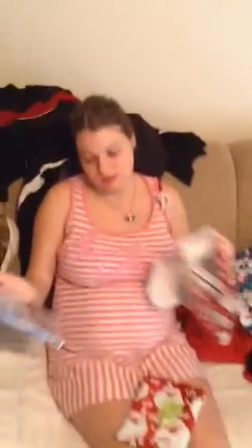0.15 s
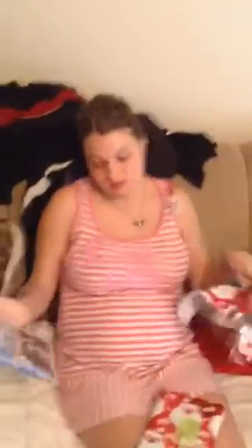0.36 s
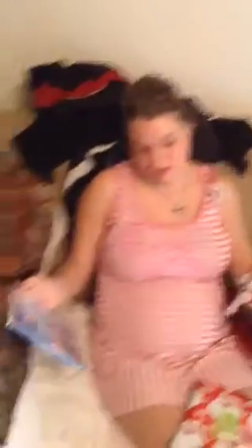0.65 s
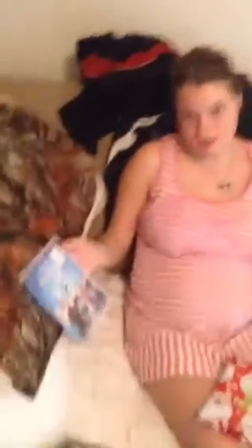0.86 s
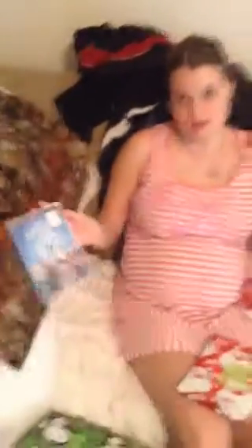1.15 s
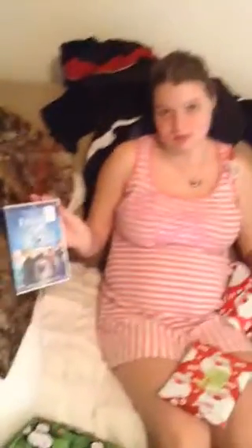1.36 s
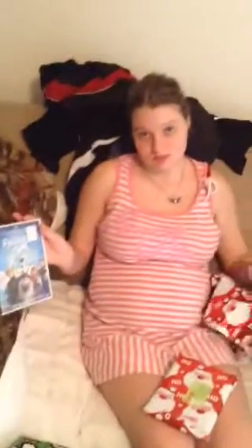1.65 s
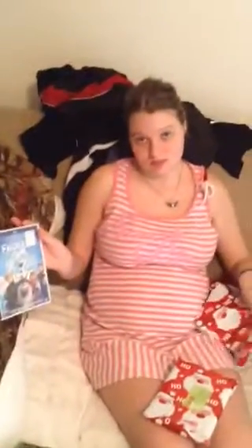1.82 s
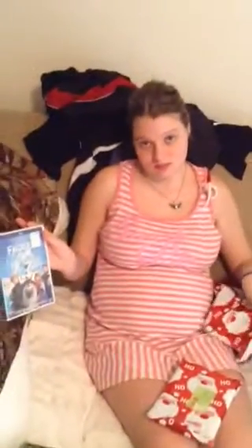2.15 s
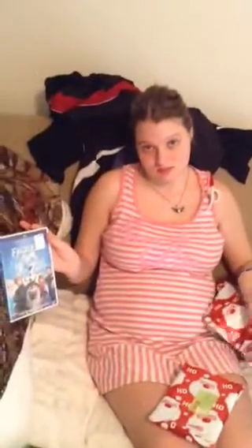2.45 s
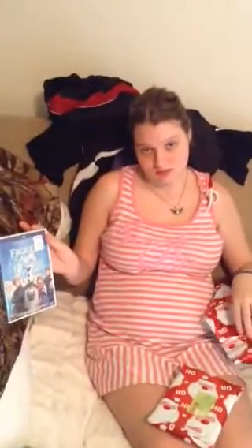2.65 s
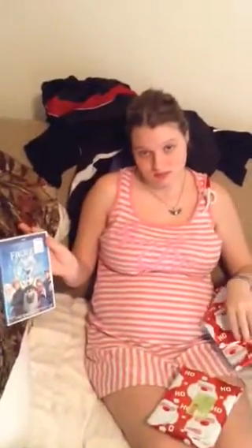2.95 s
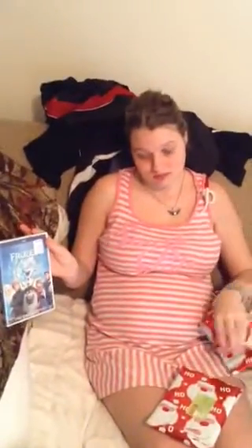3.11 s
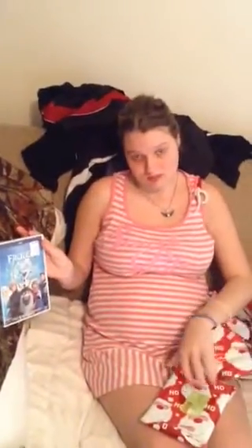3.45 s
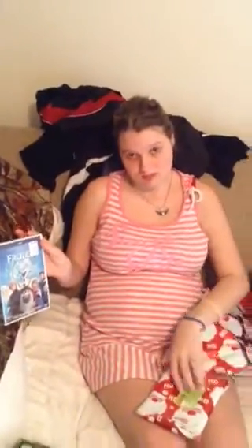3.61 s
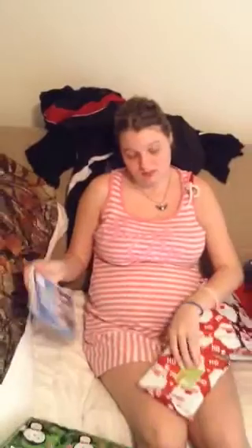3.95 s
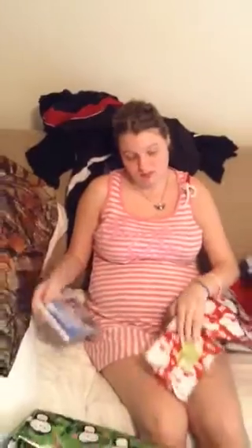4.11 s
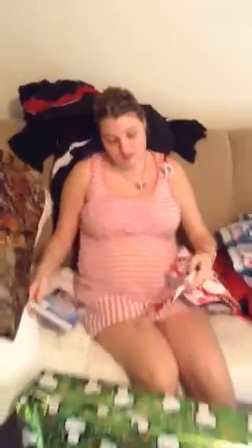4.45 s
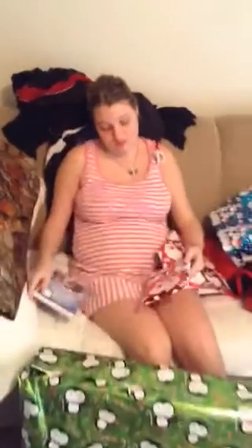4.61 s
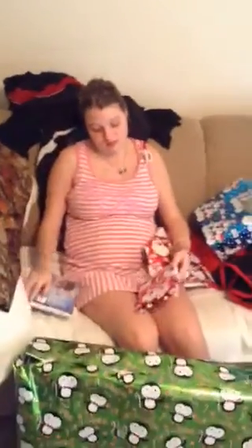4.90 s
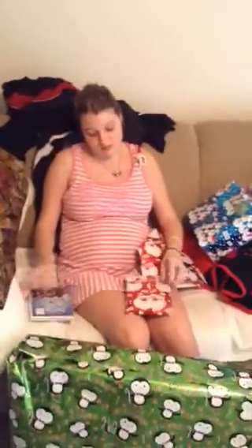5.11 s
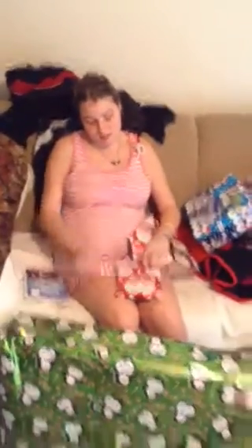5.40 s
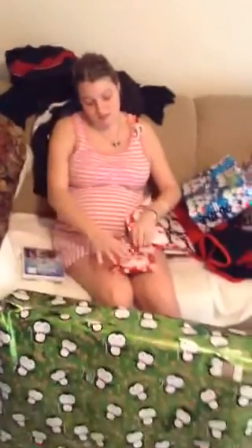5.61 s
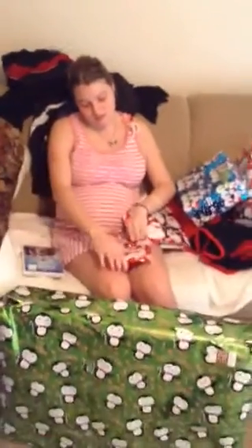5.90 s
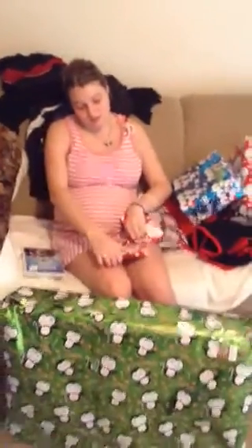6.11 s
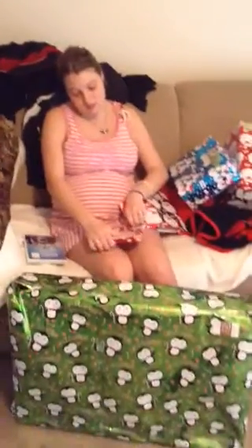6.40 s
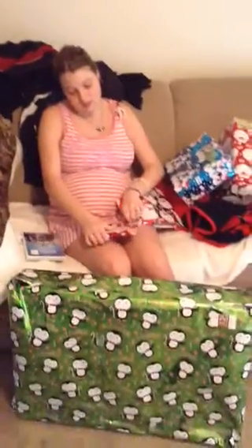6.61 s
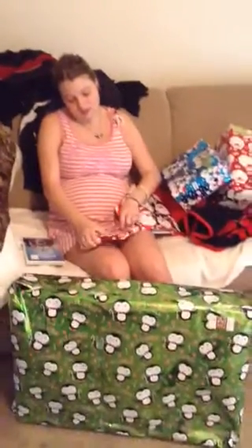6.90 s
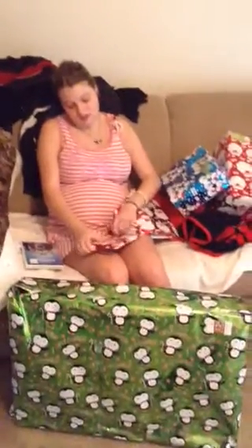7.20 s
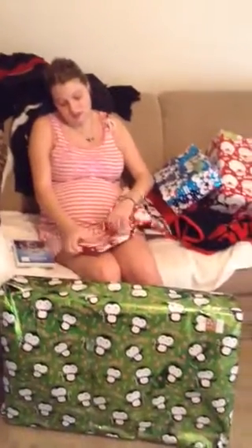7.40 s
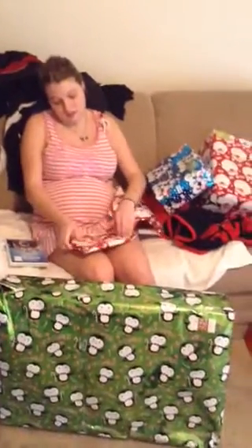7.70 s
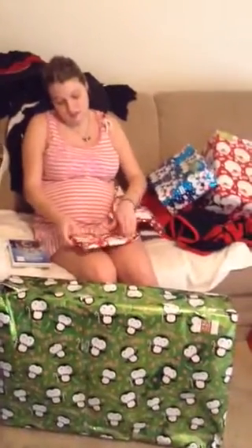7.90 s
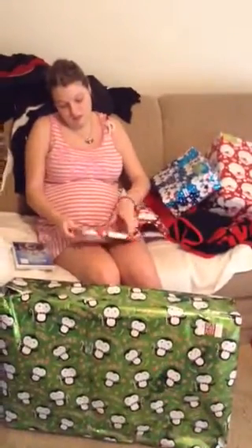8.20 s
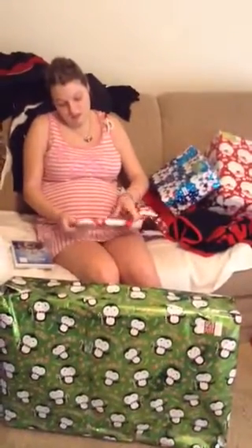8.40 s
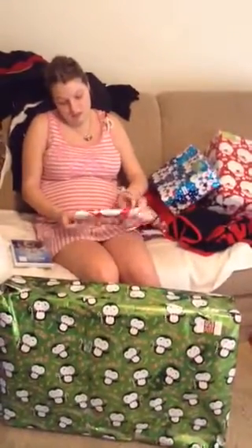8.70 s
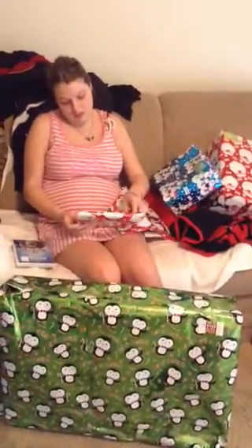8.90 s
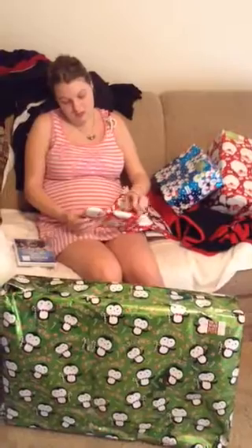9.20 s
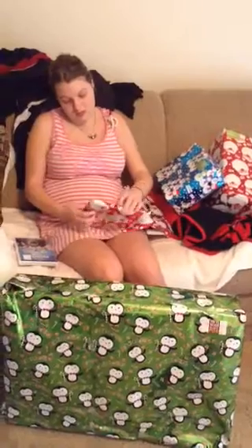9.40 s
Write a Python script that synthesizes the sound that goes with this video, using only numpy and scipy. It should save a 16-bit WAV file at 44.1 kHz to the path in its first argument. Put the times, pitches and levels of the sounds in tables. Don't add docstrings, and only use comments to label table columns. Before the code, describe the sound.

A quiet furnished living room, heard from a phone a few steps away: a faint low motor hum wavers over duct rumble and soft air hiss throughout. Stiff gift paper crackles at once, with a strong snap cluster around 0.3 s, rustling to about 1 s, and sharp pops near 1.6 and 1.9 s. At about 2.2 s a flat plastic case rubs hollowly on a blanket, rising slightly in pitch, then things thin out. Crisp snaps return at 3.1-3.4 s, with cloth shifting and more pops around 3.8-4.2 s. A loud crease cracks at 4.65 s, followed by sliding sheets and scattered pops to 6.2 s as the hum grows a little clearer. A hard snap at 6.56 s leads into a brief bright rip at 6.75 s, with thin high tape squeaks at 6.9-7.3 s. Smaller crumples, flicks and rustles continue unevenly until about 9.6 s.

```python
import sys
import numpy as np
from scipy import signal
from scipy.fft import rfft, irfft, next_fast_len
from scipy.io import wavfile
from scipy.ndimage import uniform_filter1d

SR = 44100
rng = np.random.default_rng(int(sys.argv[2]) if len(sys.argv) > 2 else 0)


def gain_from_decibels(decibels):
    exponent = np.asarray(decibels, float) / 20
    return 10 ** exponent


def store_pcm(level_fs):
    pcm = np.round(np.clip(level_fs, -1, 1) * 32767).astype(np.int16)
    wavfile.write(sys.argv[1], SR, np.atleast_2d(pcm).T)


N = 421155

# time in seconds, level in dB rms.
HUM = [(0, -50.5), (.21, -54.5), (.48, -52), (.79, -57.5), (1.38, -54), (1.73, -57), (2.66, -53.5),
       (2.93, -58.5), (3.08, -52.5), (4.28, -56), (5.93, -47.5), (6.65, -50), (6.86, -50.5), (8.67, -49.5),
       (9.12, -53), (9.28, -48.5)]
# frequency in Hz, density in dB per Hz.
AIR_SPECTRUM = [(100, -50), (500, 5.5), (1000, -3), (1700, -8.5), (3000, -8.5), (6000, -17), (10000, -17),
                (15500, -26)]
# frequency in Hz, density in dB per Hz.
RUMBLE_SPECTRUM = [(40, -46), (90, -23.5), (130, -8), (190, -1), (300, -2), (420, -5), (600, -30),
                   (1000, -33)]
# frequency in Hz, width in Hz, lift in dB.
STANDING_WAVES = [(122.4, 3.1, 4), (142, 6, 1), (162, 7.2, -5.5), (185, 3.7, 7), (267, 3.2, 0.5),
                  (315, 5.5, 1), (362, 18, 1.5), (475, 12, 3.5)]
# frequency in Hz, 60 dB decay in seconds.
ROOM_T60 = [(300, 0.13), (1300, 0.4), (3500, 0.39), (9000, 0.28), (15000, 0.15)]
# frequency in Hz, gain in dB.
PAPER_COLOUR = [(250, -15), (600, 2.5), (1200, 3), (2500, 5), (4500, 4), (6000, 0), (8200, 2.5), (11000, 1),
                (14300, -3.5), (15500, -12)]

# time of peak in seconds, reach in seconds, peak in dB.
CLOTH_SHIFTS = [(.45, .1, -60), (.98, 0.31, -57), (1.65, 0.21, -52), (2.3, 0.98, -58.5),
                (2.55, 0.61, -59.5), (3.319, 0.24, -55), (3.67, 0.092, -47.5), (4.07, 0.52, -52),
                (4.68, 0.066, -48), (5.18, 0.22, -54), (5.45, 0.36, -60), (6.06, 0.36, -57),
                (6.6, 0.092, -62), (6.78, 0.21, -52.5), (7.71, 0.81, -59), (8.32, 0.48, -63),
                (9.28, 0.085, -65), (9.55, 0.066, -54)]
# time in seconds, frequency in Hz, level in dB rms.
CASE_RUB = [
    (2.14, 584, -85),
    (2.17, 590, -45),
    (2.2, 600, -63),
    (2.31, 830, -62),
    (2.37, 900, -62),
    (2.5, 892, -68),
    (2.58, 846, -80),
    (2.65, 860, -101),
]
# time of peak in seconds, reach in seconds, peak in dB, sheen in dB against it.
LAY_ASIDE_SLIDES = [(0, 0.35, -61.5, -7), (.32, 0.064, -54, -18), (.49, 0.14, -51, -2), (.7, 1, -55, -7),
                    (0.998, 0.21, -53.5, -11), (1.5, 0.17, -60, -17), (1.798, 1, -59, -6.5),
                    (2.03, 0.13, -53, -5.5), (2.15, 0.045, -47, -10), (3.33, 0.31, -55.5, -4.5),
                    (3.68, 0.16, -62, -18), (3.9, 0.14, -49, -10), (4.14, 0.32, -49, -6),
                    (4.359, .2, -74, -8)]
# time of peak in seconds, reach in seconds, peak in dB, sheen in dB against it.
OPENING_SLIDES = [(4.68, 0.29, -50, -10), (4.92, 0.66, -61, -3), (5.1, 0.15, -50.5, -4),
                  (5.5, 0.49, -54, -11), (5.85, 0.055, -45, -20), (6.08, 0.28, -52.5, -10),
                  (6.22, 0.16, -54, -16), (6.8, 0.11, -52, 0), (6.95, 0.23, -53, -14),
                  (7.08, 0.37, -52.5, -6), (7.32, 0.066, -50, -11), (7.71, 0.72, -51.5, -8.5),
                  (8, 0.42, -56.5, -6.5), (8.19, 0.16, -51, -5), (8.33, 0.22, -72, 8),
                  (8.51, 0.17, -53, -20), (8.7, 0.089, -58.5, 6), (8.9, 0.22, -56, -4),
                  (9.12, 0.12, -66.5, 7), (9.28, 0.18, -50, -6), (9.55, 0.079, -44, -6)]
# time in seconds, frequency in Hz, level in dB rms.
TAPE_SQUEAKS = [
    [(6.878, 8650, -73), (6.884, 8808, -58), (6.928, 9000, -62), (6.966, 8800, -55), (6.978, 8560, -66)],
    [(7.045, 7504, -77), (7.051, 7634, -60), (7.075, 7600, -62), (7.088, 7500, -63), (7.096, 7350, -72)],
    [(7.235, 7950, -74), (7.25, 7900, -66), (7.285, 7650, -72), (7.295, 7650, -78)],
]

# start in seconds, peak in dB, focus in Hz, dying time in seconds.
CUSHION_KNOCKS = [
    (2.168, -56, 616, 0.0034),
    (2.421, -66, 960, 0.041),
]
# body in dB, gloss in dB.
KNOCK_COLOUR = (9, -19)
# start in seconds, peak in dB, dying time in seconds.
GLOSSY_FLICKS = [
    (.47, -61, 0.034),
    (1.15, -60, .03),
    (1.491, -60, .03),
    (5.551, -54.5, 0.034),
    (6.391, -58, 0.021),
    (7.809, -51, 0.0043),
    (8.247, -44.5, 0.02),
]
# body in dB, gloss in dB, focus in Hz.
FLICK_COLOUR = (-18, 1, 11000)
# start in
# seconds, peak in dB.
GLOSSY_TICKS = [
    (.612, -55),
    (0.966, -57),
    (6.674, -53),
    (6.716, -49),
    (6.932, -47),
]
# body in dB, gloss in dB, focus in Hz, dying time in seconds (held to 0.03).
TICK_SHAPE = (-13, 2.5, 11000, 0.5)
# start in seconds, peak in dB, body in dB, gloss in dB.
FINGER_DENTS = [(.8699, -53, -13, -2), (1.496, -55, -10, -15), (1.864, -47.5, 1, -1),
                (2.5315, -58, -2, -33), (3.487, -47.5, -14, -34), (3.68, -44.5, -6, -27),
                (4.4362, -49, -35, -9), (4.597, -48, -4, -16), (4.805, -48.5, -0.5, -1),
                (4.9682, -45.5, -1, -19), (5.4646, -51, -20, -5), (5.916, -48, -26, -28),
                (6.186, -52, -3, 2), (7.3348, -47, -10, -7), (7.406, -48, -7, -30),
                (7.4928, -48.5, -11, -5), (7.639, -47.5, -5, -10), (7.714, -48, -17, -24),
                (8.067, -50, -20, -1), (8.6022, -46, -30, -35), (9.109, -55, -19, -12),
                (9.248, -44.5, -16, -9), (9.5087, -46, -2, -2)]
# start in seconds, peak, body and gloss in dB, focus in Hz.
WIDE_FOLDS = [(0.2801, -34.5, -13, -8.5, 2180), (0.361, -35, -9, -13, 1800), (1.905, -50.5, -7, 9, 4970),
              (4.9925, -42.5, -14, -12, 1800), (5.411, -46, -7, -26, 1800), (6.534, -53, -6, -2, 4450),
              (7.096, -35.5, -11.5, -3, 4570), (7.1654, -39, -14, -3.5, 1390),
              (8.2158, -40.5, -9, -5, 4080), (8.6504, -45, -8, -6, 4460), (8.775, -38, -6.5, -2, 2460),
              (9.298, -39, -9.5, -3.5, 4100), (9.535, -40.5, -8, -16.5, 3000)]
# start in seconds, peak, body and gloss in dB, focus in Hz.
CRUMPLES = [(0.275, -42, -9, -15, 2500), (0.448, -43, -15, -18, 1700), (0.535, -35.5, -5, -4, 4330),
            (0.604, -45, -6, -10, 2600), (0.98, -35, -8.5, -7, 2400), (1.604, -36.5, -26, 2.5, 4200),
            (1.735, -46.5, -12, -12, 1650), (2.133, -48, -5, -8, 1970), (3.3131, -44.5, -14, -46, 1730),
            (3.707, -40.5, -6, -10, 1990), (6.298, -40.5, -11, -2, 4020), (6.66, -41, -11, -5, 2510),
            (6.8237, -31, -13, -6, 2590), (6.9655, -37.5, -8.5, -3, 4150), (7.012, -50, -12, 4, 4500),
            (7.052, -41.5, -12, -28, 1410), (7.202, -36, -13, -2.5, 2430), (7.233, -51, -1, 1, 4830),
            (7.36, -55, -22, 5, 4700), (7.553, -51, -18, -1, 3410), (8.489, -40.5, -16, -2, 4000),
            (8.6978, -44, -15, -2, 4020), (8.74, -40, -7, 4.5, 3040), (9.2008, -48, -6, -12, 3870)]
# start in seconds, peak, body and gloss in dB, focus in Hz.
POPS = [(0.1087, -33, -8.5, -1.5, 4000), (0.8341, -41, -10, -5.5, 1750), (1.5992, -27.5, -9, -12, 1890),
        (1.878, -31.5, -20, -13, 2450), (2.099, -36.5, -15, -16, 1830), (2.406, -41.5, -12, -1.5, 9600),
        (3.2195, -28.5, -14, -4, 5360), (3.369, -34, -14.5, -10, 1570), (3.658, -41.5, -2, -34, 1730),
        (3.8384, -35.5, -7.5, -10, 1850), (3.995, -37.5, -4, -35, 1980), (4.1053, -33, -5, -2.5, 3900),
        (4.523, -44, -2, -29, 1700), (6.559, -26.5, -12, -1.5, 4570), (6.9325, -33.5, -38, -8, 3760),
        (7.732, -44, -23, 3, 5150), (7.962, -35, -11.5, -5.5, 4600), (8.308, -40, -13, -3, 4640),
        (8.357, -39.5, -15, -4, 3970), (9.3663, -41.5, -15, 0, 3600), (9.4434, -41.5, -30, -5, 4910)]
# start in seconds, peak, body and gloss in dB, focus in Hz.
RUNNING_POPS = [(0.305, -22.5, -18.5, -4.5, 1410), (0.9084, -43.5, -12, -0.5, 1770),
                (1.6652, -37, -18, -10, 1770), (3.1325, -37, -4, -17, 2460), (4.0655, -37, -16, -23, 4020),
                (4.208, -31.5, -8, -7.5, 2420), (4.6491, -25, -15.5, -7.5, 2500),
                (5.0244, -31.5, -19, -25, 2900), (5.144, -32.5, -1.5, -12, 2520),
                (5.8343, -36, -11.5, 2.5, 1900), (6.029, -35, -8.5, -6.5, 1770),
                (6.2191, -33, -11, 3, 4070), (8.469, -44.5, -12, 10.5, 1330), (9.1647, -40, -14, 0.5, 4100)]
# start in seconds, peak, body and gloss in dB, dying time in seconds.
RIP = [
    (6.7277, -40, -28, 19.5, 0.001),
    (6.7297, -30.5, -8, 8, 0.0016),
    (6.7321, -32, -8, -5, 0.00044),
    (6.7331, -31, -27, 7, 0.00098),
    (6.735, -30.5, -17.5, 5, 0.045),
    (6.761, -35, -12, 13.5, 0.0019),
    (6.7649, -27.5, -11.5, 4, 0.0097),
    (6.7702, -33.5, -18, 6.5, 0.024),
]
# start in seconds, peak in dB, gloss in dB, focus in Hz.
SMALL_CRACKS = [(0.3108, -23.5, -31, 1660), (0.3207, -25, -7, 2120), (0.537, -30, -18, 2430),
                (0.605, -41, -15, 2700), (1.6055, -29, -4, 2900), (1.73, -35.5, -12, 1690),
                (2.534, -50, -19, 1760), (2.7794, -58, -12, 1590), (3.22, -23.5, -11, 2200),
                (3.2979, -34.5, -20, 1940), (3.3104, -36, -27, 1720), (3.4937, -39, -23, 2600),
                (3.528, -46, -21, 1490), (3.59, -44, -24, 1730), (3.6273, -49, -19, 1550),
                (3.7113, -37, -27, 2960), (3.7814, -42, -18, 2040), (3.8464, -46, -19, 1770),
                (3.9094, -40, -14, 1660), (4.1124, -34, -5, 3640), (4.2134, -33, -14, 1580),
                (4.558, -40, -16, 1560), (4.796, -46, -13, 2370), (4.992, -54, -17, 1800),
                (5.035, -37, -20, 3100), (5.0464, -35, -6, 3010), (5.151, -34.5, -13, 3700),
                (5.4256, -42.5, -18, 1310), (6.2454, -34, -1, 4070), (6.2614, -36, -2, 3940),
                (6.3144, -48, -13, 1950), (6.7448, -22, -4, 3950), (6.7814, -23, -6, 3650),
                (6.7932, -27, -11, 2730), (6.8277, -39, -9, 2710), (6.9754, -40, -14, 3730),
                (7.013, -38, -14, 4780), (7.1024, -35, -19, 3720), (7.2084, -38, -19, 2360),
                (7.3574, -44, -12, 4250), (7.6081, -53, -8, 4890), (7.78, -42.5, -3, 1340),
                (7.9448, -44, -6, 3020), (8.4727, -39, -14, 4260), (8.757, -27, 1, 4460),
                (8.8982, -46, -10, 1800), (8.987, -61, -11, 1790), (9.1067, -46, -8, 3840)]
# start in seconds, peak in dB.
SPARKS = [
    (3.8404, -47),
    (6.175, -49),
    (6.387, -54),
    (6.392, -58),
    (6.56, -40),
    (6.7268, -40),
    (6.7313, -25),
    (6.733, -49),
    (8.064, -56),
]
# start in seconds, peak in dB, gloss in dB, focus in Hz, dying time in seconds.
LEADING_CRACKS = [(0.3053, -29, -8, 2000, .002), (.515, -44, -16, 2500, 0.0083),
                  (0.528, -32, -12, 3500, 0.0055), (0.532, -33.5, -11, 3600, .006),
                  (0.966, -55, 10, 12500, .0015), (.9715, -54, -1, 13500, .0015),
                  (0.9748, -34.5, -13, 3580, 0.0081), (1.5942, -33, -5, 2800, 0.0037),
                  (1.5993, -34.5, 2, 11500, .003), (1.6645, -38.5, -14, 3000, 0.0022),
                  (1.8597, -54, -12, 3000, 0.0027), (1.907, -55, 6, 11000, .002),
                  (2.0141, -62, 8, 11000, 0.0018), (2.0988, -45, -14, 3000, .003),
                  (3.2179, -27.5, -6, 5400, 0.0031), (3.2235, -35, -2, 12000, .003),
                  (3.8585, -46, -8, 2000, .003), (4.2885, -48.5, 0, 3000, 0.0034),
                  (4.6475, -34.5, 2, 3560, 0.0013), (4.7631, -66, 6, 12000, .001),
                  (5.0242, -37, -14, 3000, 0.0023), (5.465, -51, -8, 2500, .003),
                  (5.5885, -51, -1, 2500, .003), (5.8476, -50.5, 4, 10000, .003),
                  (6.0292, -47, -18, 1800, 0.0033), (6.2985, -46, -4, 4000, .003),
                  (7.1635, -52, 2, 7000, 0.0014), (7.357, -51, -2, 5000, 0.0018),
                  (7.732, -49, 6, 8500, .0007), (7.737, -48, 6, 8500, .0007), (7.742, -53, 1, 8500, .0007),
                  (8.0662, -54.5, -3, 4000, .004), (8.464, -54, 5, 9000, .008),
                  (6.02, -48, -6, 3500, 0.0022), (0.6064, -46, -15, 2700, 0.0017),
                  (8.6783, -49, -4, 4000, 0.0049), (9.2534, -49, -10, 3000, 0.0027)]

HUM_HZ, AIR_DB = 240.3, -63
DUCT_DB, DUCT_DB_PER_S = -61.5, 0.25
ROOM_DB = -10.5
REACH_DB, STILL_DB, CLOTH_DB = 15, -91, -65.5
RUB_WIDTH_HZ = 45
FLECKS_PER_S, FLECK_DB, FLECK_CYCLES = 260, -10.5, 26
BURST = 3072
RIP_HZ, DENT_HZ = 4430, 1800
POP_S, RUN_S, CRUMPLE_S, FOLD_S, DENT_S = 0.024, 0.034, 0.026, 0.037, 0.025
CRACK_BODY_DB, CRACK_S, HEAD_BODY_DB = -11.5, 0.011, -16
PHONE_TOP_HZ = 15420


def rms_one(x):
    return x / np.sqrt(np.mean(x ** 2) + 1e-20)


def rms_peak(x):
    return np.sqrt(uniform_filter1d(x ** 2, size=128).max())


def in_time(rows):
    s, *columns = np.transpose(rows)
    return [np.interp(np.arange(N) / SR, s, column) for column in columns]


def at_hz(points, hz):
    point_hz, value = np.array(points)[:, 0], np.array(points)[:, 1]
    return np.interp(np.log(hz + 1), np.log(point_hz), value)


def coloured(x, points):
    size = next_fast_len(len(x))
    hz = np.arange(size // 2 + 1) * SR / size
    spectrum = rfft(x, size) * gain_from_decibels(at_hz(points, hz))
    return rms_one(irfft(spectrum, size)[:len(x)])


def band(x, low_hz, high_hz):
    sos = signal.butter(2, [low_hz, high_hz], "band", fs=SR, output="sos")
    return rms_one(signal.sosfilt(sos, x))


def drift(rate_hz):
    r = np.exp(-80 * np.pi * rate_hz / SR)
    noise = rng.standard_normal(N // 40 + 2002)
    slow = signal.lfilter([1], [1, -2 * r, r * r], noise)[2000:]
    return np.interp(np.arange(N) / 40, np.arange(len(slow)), rms_one(slow))


def grains(shape, per_s, spread_db):
    born = rng.random(shape) < per_s / SR
    size = gain_from_decibels(spread_db * np.minimum(rng.exponential(1, shape), 4))
    return born * size * rng.choice([-1, 1], shape)


def swells(s, reach, peak_db, rest_db):
    t = np.arange(0, N + 64, 64) / SR
    power = gain_from_decibels(peak_db - REACH_DB * np.abs(t[:, None] - s) / reach) ** 2
    total = np.sqrt(power.sum(axis=1) + gain_from_decibels(rest_db) ** 2)
    return np.interp(np.arange(N) / SR, t, total)


def standing():
    hz = np.geomspace(40, 1000, 400)
    lift = sum(db * np.exp(-((hz - top_hz) / width) ** 2) for top_hz, width, db in STANDING_WAVES)
    return np.c_[hz, at_hz(RUMBLE_SPECTRUM, hz) + lift]


def house():
    hum_db, = in_time(HUM)
    hum_turn = 2 * np.pi * np.cumsum(HUM_HZ + 0.259 * drift(2.14)) / SR
    hum = np.sqrt(2) * gain_from_decibels(hum_db + 0.48 * drift(3.1)) * np.sin(hum_turn)
    rumble_db = DUCT_DB + DUCT_DB_PER_S * np.arange(N) / SR
    rumble = gain_from_decibels(rumble_db + 6.0) * coloured(rng.standard_normal(N), standing())
    hiss = gain_from_decibels(AIR_DB) * coloured(rng.standard_normal(N), AIR_SPECTRUM)
    return hum + rumble + hiss


def room(x):
    t, edges = np.arange(SR // 2) / SR, np.geomspace(200, 16000, 8)
    noise = rng.standard_normal(len(t)) * np.clip((t - .002) / 0.0031, 0, 1)
    tail = 0
    for low, high in zip(edges, edges[1:]):
        decay = gain_from_decibels(-60 * t / at_hz(ROOM_T60, np.sqrt(low * high)))
        tail = tail + band(noise, low, high) * np.sqrt(high - low) * decay
    return signal.fftconvolve(x, tail / np.sqrt(np.sum(tail ** 2)))[:N]


def cloth():
    fibres = gain_from_decibels(2.0 * drift(2.0)) * band(rng.standard_normal(N), 496, 1180)
    return gain_from_decibels(-4.0) * swells(*np.transpose(CLOTH_SHIFTS), CLOTH_DB) * fibres


def rub():
    hz, level_db = in_time(CASE_RUB)
    turn = 2 * np.pi * np.cumsum(hz) / SR
    return gain_from_decibels(level_db) * (drift(RUB_WIDTH_HZ) * np.sin(turn) + drift(RUB_WIDTH_HZ) * np.cos(turn))


def rustle():
    s, reach, paper_db, sheen_db = np.transpose(LAY_ASIDE_SLIDES + OPENING_SLIDES)
    ticks = grains(N, 4500 * gain_from_decibels(6 * drift(22)), spread_db=2.0)
    dull, bright, gloss = 1.2 * drift(9), 1.5 * drift(8), 1.5 * drift(8)
    low, middle = band(ticks, 1200, 3000), band(ticks, 2600, 5300)
    high, top = band(ticks, 6000, 11000), band(ticks, 9500, 14500)
    paper = gain_from_decibels(dull - 9.5) * low + gain_from_decibels(-dull - 7.0) * middle
    sheen = gain_from_decibels(bright - 1) * high + gain_from_decibels(gloss - 5.5) * top
    paper = gain_from_decibels(-2.0) * swells(s, reach, paper_db, STILL_DB) * paper
    sheen = gain_from_decibels(-1.0) * swells(s, reach, paper_db + sheen_db, STILL_DB) * sheen
    return paper + sheen


def flecks():
    s, reach, paper_db, _ = np.transpose(LAY_ASIDE_SLIDES + OPENING_SLIDES)
    clicks = grains(N, FLECKS_PER_S * gain_from_decibels(3.3 * drift(13)), spread_db=2.0)
    patch = rng.integers(0, 16, N)
    out = 0
    for k, hz in enumerate(np.geomspace(1000, 5200, 16)):
        r, w = gain_from_decibels(-60 * hz / (FLECK_CYCLES * SR)), 2 * np.pi * hz / SR
        struck = clicks * (patch == k) + 1e-18
        ring = signal.lfilter([0, np.sin(w)], [1, -2 * r * np.cos(w), r * r], struck)
        out = out + ring * np.sqrt(hz)
    return gain_from_decibels(FLECK_DB) * swells(s, reach, paper_db, STILL_DB) * rms_one(out)


def tape():
    out = np.zeros(N)
    for rows in TAPE_SQUEAKS:
        fade_in = (rows[0][0] - .01, rows[0][1], -100)
        fade_out = (rows[-1][0] + .01, rows[-1][1], -100)
        hz, level_db = in_time([fade_in, *rows, fade_out])
        turn = 2 * np.pi * np.cumsum(hz + 25 * drift(48)) / SR
        out += np.sqrt(2) * gain_from_decibels(level_db) * np.sin(turn)
    return out


def snaps(rows, rise, per_s, first, gain_db, head=0):
    out, t = np.zeros(N + BURST), np.arange(BURST) / SR
    clicks = grains((len(rows), BURST), per_s, spread_db=3.0)
    clicks[:, 0] = first
    lumps = rng.normal(0, 1, (len(rows), 40))
    turns = rng.integers(0, 3, (len(rows), 40)).repeat(BURST // 40 + 1, axis=1)[:, :BURST]
    dealt = turns == np.arange(3)[:, None, None]
    patches = rng.normal(0, 1, (len(rows), 3, 14))
    hz = np.arange(BURST + 1) * SR / (2 * BURST)
    for k, (s, peak_db, low_db, top_db, focus_hz, fall) in enumerate(rows):
        swell = (1 - np.exp(-(t + 0.000087) / rise)) ** 2 * np.exp(-t / np.clip(fall, .0005, .03))
        swell *= 1 + head * np.exp(-t / 0.0014)
        lump_db = 1.2 * np.interp(t, np.linspace(0, t[-1], 40), lumps[k])
        click = clicks[k] * swell * gain_from_decibels(lump_db)
        tilt = at_hz([(600, low_db + 14.5), (1200, low_db + 12.5), (1900, 0.0052), (5000, 0),
                      (7000, top_db + 1.5), (14000, top_db - 1.0)], hz)
        tilt += 6.6 * np.exp(-(np.log((hz + 1) / focus_hz) / 0.17) ** 2)
        colour = np.array([np.interp(hz, np.geomspace(400, 16000, 14), patch) for patch in patches[k]])
        level = np.log(gain_from_decibels(at_hz(PAPER_COLOUR, hz) + tilt + 2.4 * colour))
        mirrored = np.c_[level, level[:, -2:0:-1]]
        phase = -np.imag(signal.hilbert(mirrored))[:, :BURST + 1]
        spectrum = np.sum(rfft(click * dealt[:, k], 2 * BURST) * np.exp(level + 1j * phase), axis=0)
        middle = irfft(spectrum * ((hz > 1500) & (hz < 5500)))
        at = round((s - 1.6 * rise) * SR)
        out[at:at + BURST] += irfft(spectrum)[:BURST] * gain_from_decibels(peak_db + gain_db) / rms_peak(middle)
    return out[:N]


def cracks():
    rows = [(s, db, CRACK_BODY_DB, top_db, hz, CRACK_S) for s, db, top_db, hz in SMALL_CRACKS]
    rows += [(s, db, -25, 9, 13500, .0006) for s, db in SPARKS]
    return snaps(rows, .0004, 8000, first=5.0, gain_db=-12.5)


def heads():
    rows = [(s, db, HEAD_BODY_DB, *rest) for s, db, *rest in LEADING_CRACKS]
    return snaps(rows, .00015, 12000, first=6.2, gain_db=-4.0)


def creases():
    pops = [(*row, POP_S) for row in POPS]
    pops += [(*row, RUN_S) for row in RUNNING_POPS]
    pops += [(*row, *TICK_SHAPE) for row in GLOSSY_TICKS]
    rip = [(*row, RIP_HZ, fall) for *row, fall in RIP]
    soft = [(*row, CRUMPLE_S) for row in CRUMPLES]
    soft += [(*row, FOLD_S) for row in WIDE_FOLDS]
    soft += [(*row, DENT_HZ, DENT_S) for row in FINGER_DENTS]
    soft += [(s, db, *FLICK_COLOUR, fall) for s, db, fall in GLOSSY_FLICKS]
    soft += [(s, db, *KNOCK_COLOUR, hz, fall) for s, db, hz, fall in CUSHION_KNOCKS]
    popping = snaps(pops, .0004, 8000, first=13.0, head=1.0, gain_db=-10.5)
    ripping = snaps(rip, 0.00012, 15000, first=3.7, gain_db=-0.5)
    folding = snaps(soft, .0045, 9000, first=0, gain_db=-8.0)
    return popping + ripping + folding


def scene():
    background = house()
    sofa = cloth() + rub() + rustle() + flecks() + tape() + cracks() + heads() + creases()
    return (background + sofa + gain_from_decibels(ROOM_DB) * room(sofa))[None]


def low_pass(x):
    return signal.sosfilt(signal.butter(12, 16490, fs=SR, output="sos"), x)


def record(dry):
    x = signal.sosfilt(signal.butter(2, 40, "high", fs=SR, output="sos"), dry)
    kept = signal.sosfiltfilt(signal.ellip(10, .2, 40, PHONE_TOP_HZ, fs=SR, output="sos"), x)
    trace = signal.sosfilt(signal.ellip(8, .5, 50, 16300, fs=SR, output="sos"), x - kept)
    return low_pass(kept + gain_from_decibels(-35) * trace)


dry = scene()
out = record(dry)
store_pcm(out)
```